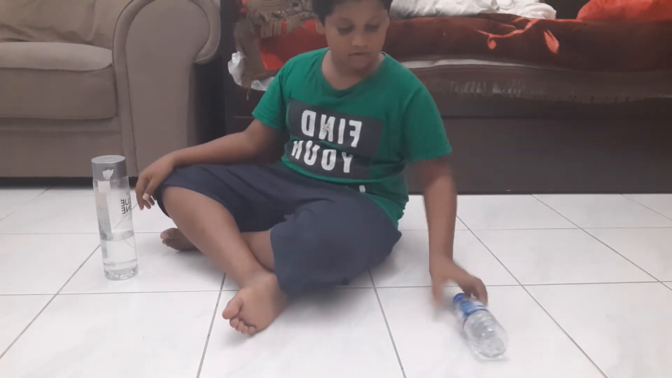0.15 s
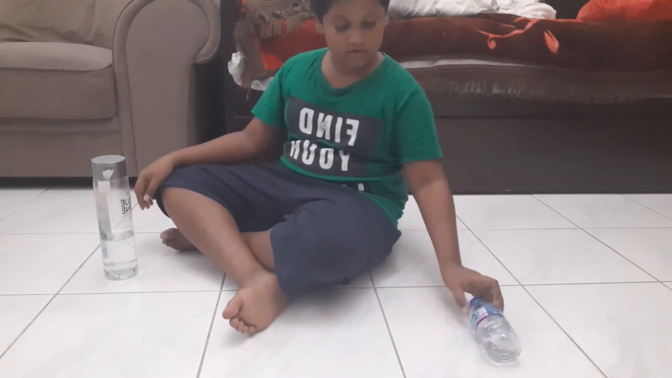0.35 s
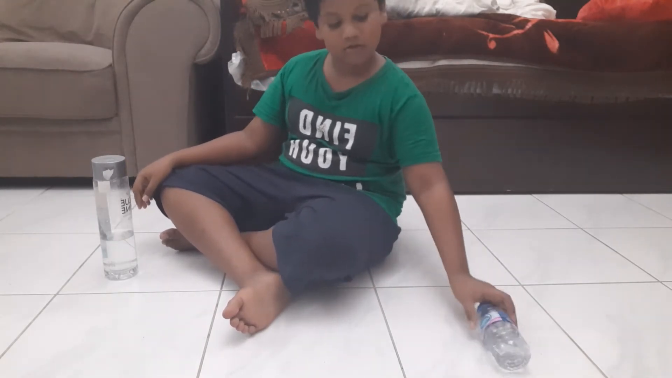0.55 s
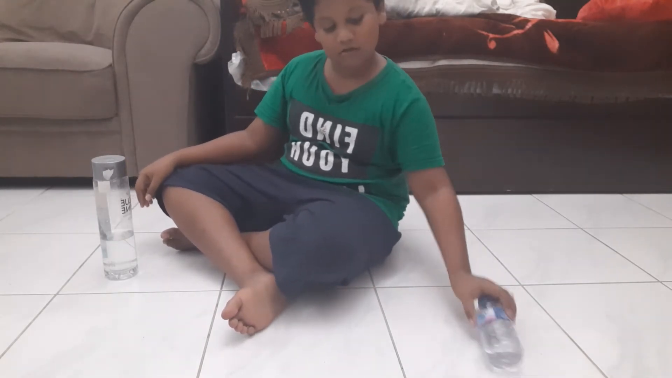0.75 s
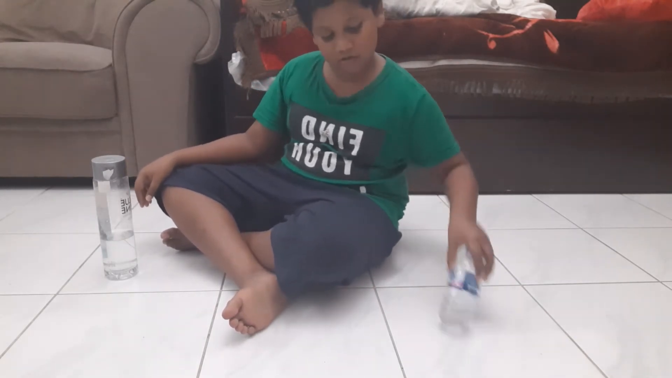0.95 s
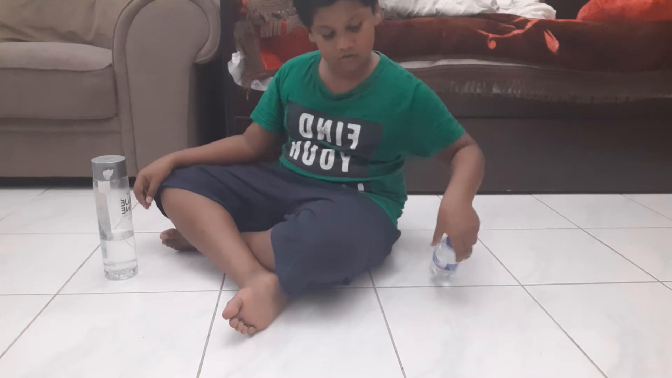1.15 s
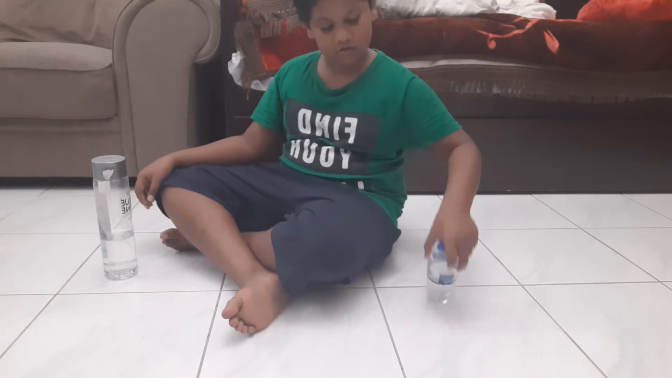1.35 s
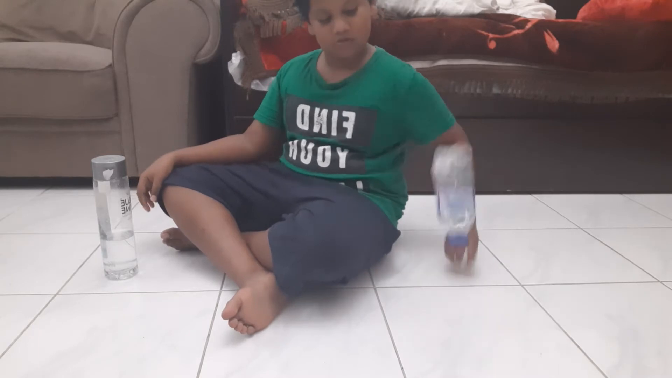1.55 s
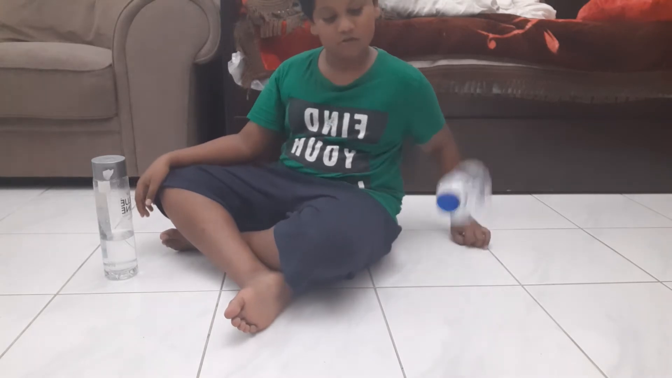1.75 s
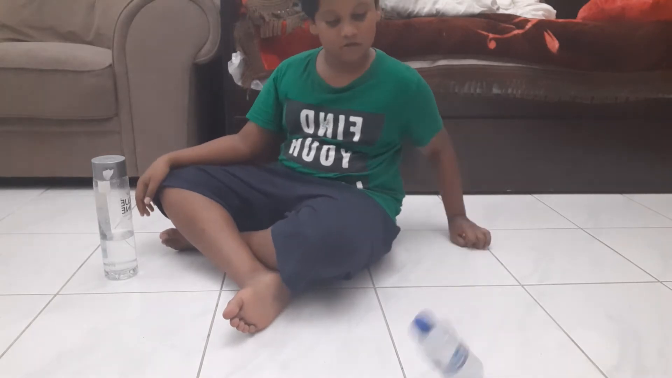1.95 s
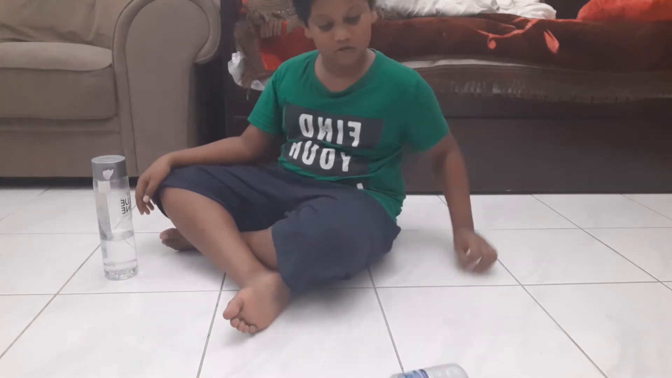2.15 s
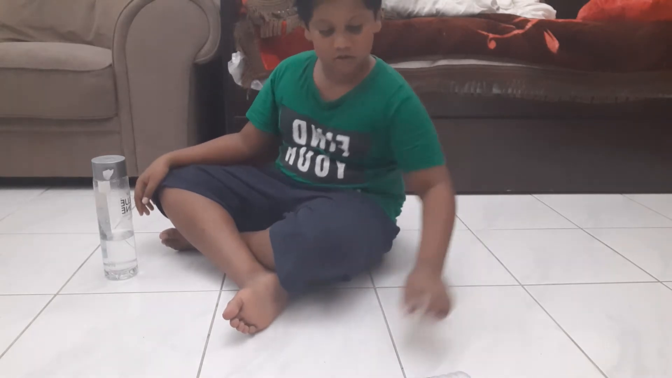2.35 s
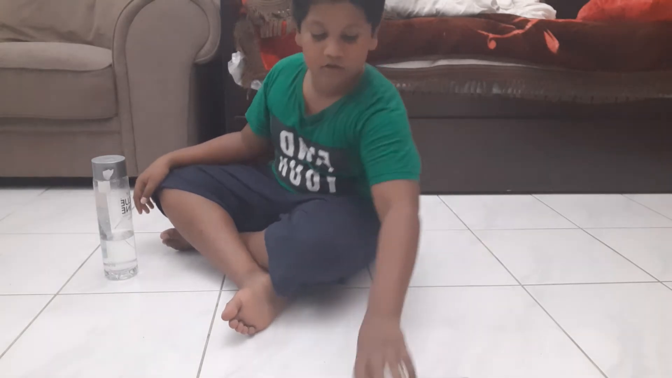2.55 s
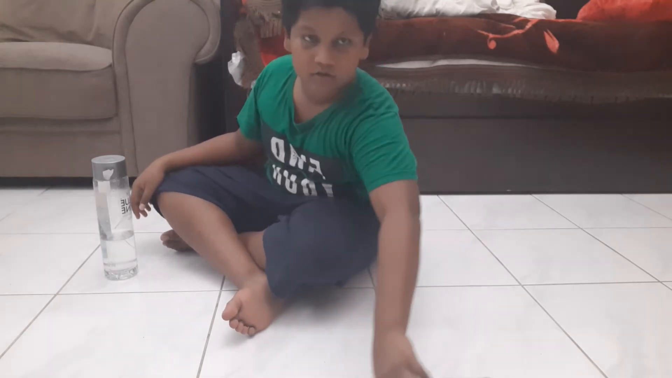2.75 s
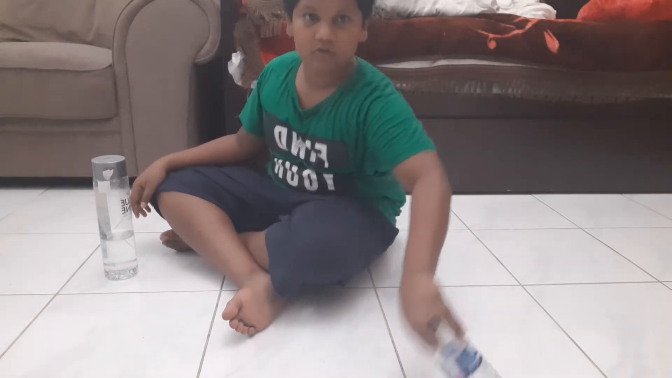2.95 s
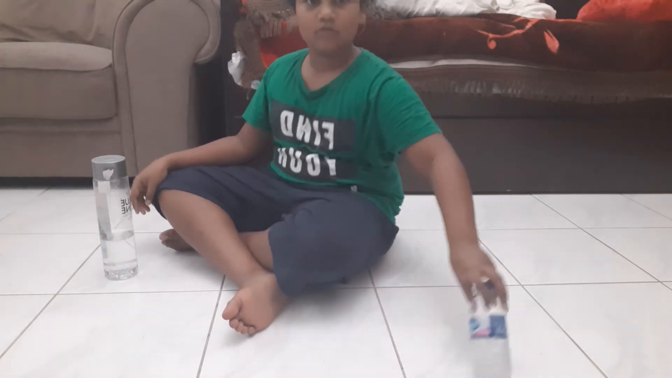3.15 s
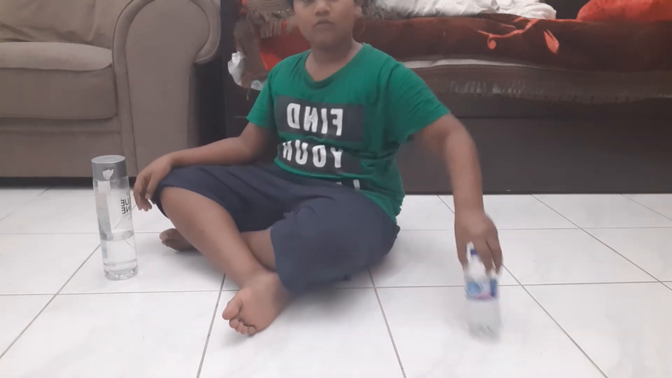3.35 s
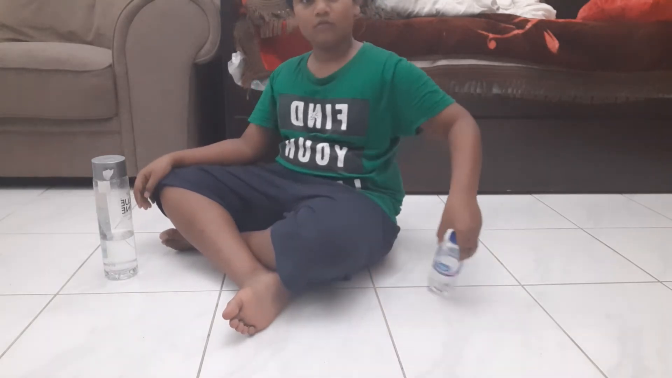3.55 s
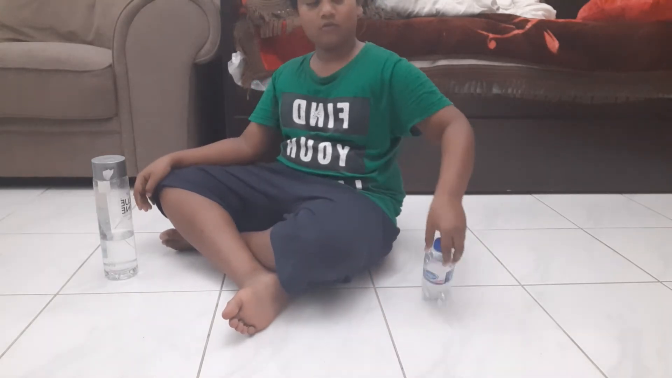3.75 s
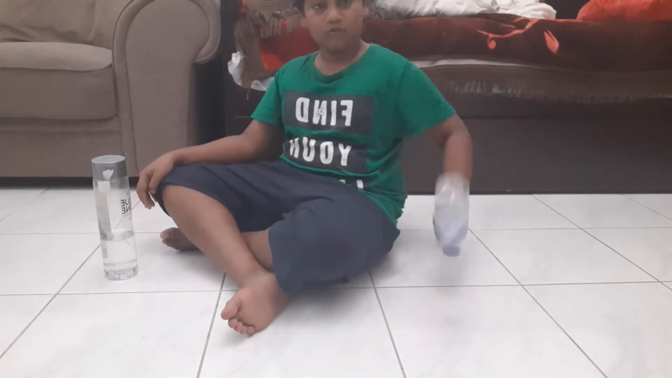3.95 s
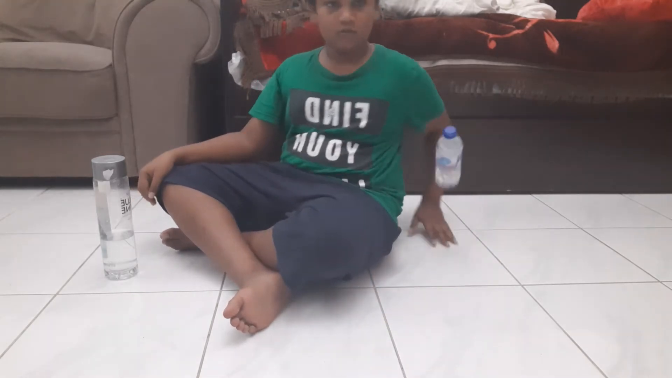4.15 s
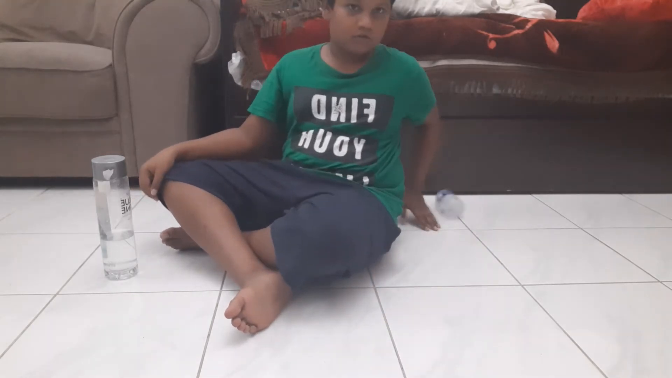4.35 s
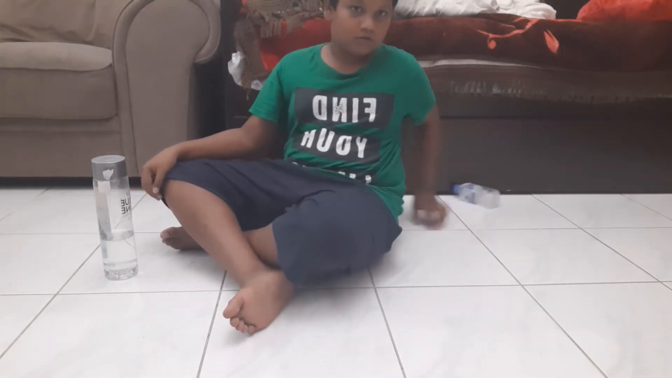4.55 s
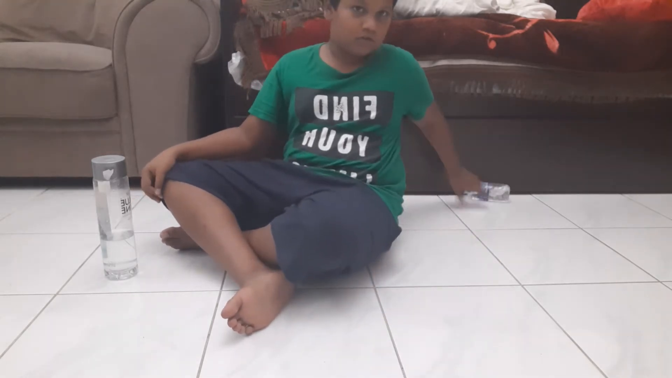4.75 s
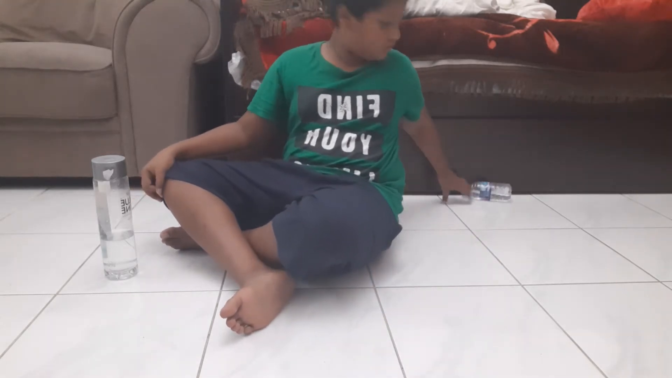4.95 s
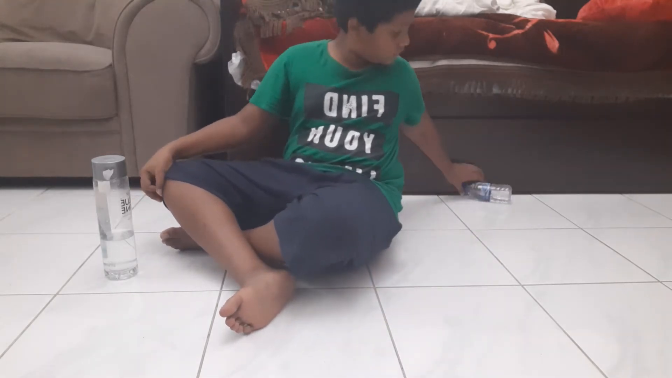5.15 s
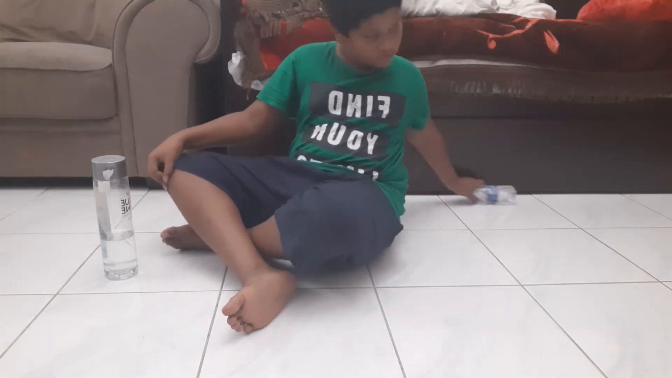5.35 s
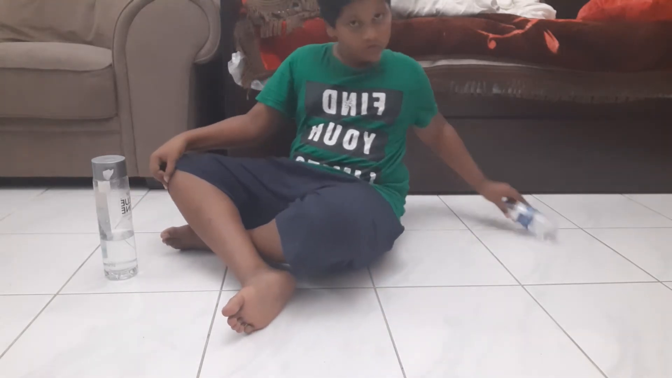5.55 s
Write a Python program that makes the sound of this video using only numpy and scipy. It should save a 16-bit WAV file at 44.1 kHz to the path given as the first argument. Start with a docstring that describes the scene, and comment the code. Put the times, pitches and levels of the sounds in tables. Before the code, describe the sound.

Light plastic ticks and watery rustle lead to a loud, hollow bottle slap on tile with a quick bounce. After a lull with small finger taps, crackling handling precedes another hard landing, which fades into faint knocks. Each hit is short and dry, with a brief room tail. Soft fan hiss, low mains hum, rapid fine motor ticking and uneven low rumble lie beneath, heard by a stereo microphone.

```python
"""A small, partly filled plastic bottle is handled, flipped and bounced twice on a tiled floor in a furnished room.
Fingers and water rustle first; near 1.9 s it lands hard and bounces. Handling resumes, it lands again
near 4.4 s, and light knocks end the scene. Each blow sums a decaying thud, shell modes and crackling noise.
Throughout, a fan gives shaped noise for hiss, sines for mains hum and a modal tick each mains cycle; a low
noise rumble of uneven level lies below. A diffuse noise tail forms the room; a two-port microphone listens."""
import sys
import numpy as np
from scipy import signal
from scipy.fft import rfft, irfft
from scipy.io import wavfile
from scipy.ndimage import uniform_filter1d

SR = 44100
rng = np.random.default_rng(int(sys.argv[2]) if len(sys.argv) > 2 else 0)


def elevation(decibels):
    """Turn decibel levels (scalar or array-like) into linear amplitude ratios."""
    levels = np.asarray(decibels, float)
    return 10 ** (levels / 20)


def generate_wav(signal):
    """Clip the signal to [-1, 1] and save it as 16-bit WAV at the path in sys.argv[1]."""
    frames = np.transpose(np.atleast_2d(signal))
    scaled = np.clip(frames, -1, 1) * 32767
    pcm = np.round(scaled).astype(np.int16)
    wavfile.write(sys.argv[1], SR, pcm)


N = 246298
TIME = np.arange(N) / SR


def on_log(table, hz, axis=1):
    """Logarithmic frequency scale: one column of a table, interpolated along log frequency."""
    table = np.array(table)
    return np.interp(np.log(np.maximum(hz, 1)), np.log(table[:, 0]), table[:, axis])


def unit(x):
    """Normalisation: the signal is scaled to rms 1."""
    return x / np.sqrt(np.mean(x ** 2))


def leveled(x, db):
    """Onset level: the rms of the first 20 ms is set."""
    return elevation(db) * x / np.sqrt(np.mean(x[:SR // 50] ** 2))


def colour(x, table, lo_hz=0, hi_hz=SR):
    """Linear filtering: a spectral envelope is applied between two band edges."""
    hz = np.arange(x.shape[-1] // 2 + 1) * SR / x.shape[-1]
    in_band = (hz >= lo_hz) * (hz < hi_hz)
    return irfft(rfft(x) * elevation(on_log(table, hz)) * in_band, x.shape[-1])


def diffuse(size, likeness):
    """Spatial coherence: mid and side noise are weighted for a set correlation of two ports."""
    hz = np.arange(size // 2 + 1) * SR / size
    like = np.clip(on_log(likeness, hz), -.9, .99)
    mid, side = rfft(rng.standard_normal((2, size)))
    mid = mid * np.sqrt(1 + like)
    side = side * np.sqrt(1 - like)
    return irfft(np.array([mid + side, mid - side]), size) / np.sqrt(2)


def fade(t, t60):
    """Exponential decay: the level falls 60 dB in t60 seconds."""
    return 1000. ** (-t / np.maximum(t60, 1e-3))


def ring(modes, t, chance, scatter_db, detune):
    """Modal superposition: decaying sines, one a row, with scattered strength, pitch and phase."""
    hz, db, t60 = np.array(modes).T[:, :, None]
    gain = elevation(db + scatter_db * chance[0])
    hz = hz * (1 + detune * chance[1])
    return gain * fade(t, t60) * np.sin(2 * np.pi * hz * t + chance[2])


def walk(rate):
    """Slow random modulation: levels held 1 / rate s and smoothed twice; spread near 1."""
    k = int(SR / rate)
    steps = np.repeat(rng.standard_normal(N // k + 1), k)
    return 1.4 * uniform_filter1d(uniform_filter1d(steps, k), k)[:N]


def add(out, x, s):
    """Linear superposition: a short sound is added from s seconds on."""
    i = int(s * SR)
    out[i:i + len(x)] += x[:max(len(out) - i, 0)]


# Blows, bounces and finger knocks on the body: (time [s], thud frequency [Hz], thud level [dB],
# favoured shell frequency [Hz], level of shell modes from 850 Hz up [dB], crack level [dB])
BLOWS = [(0.015, 358, -51.5, 1840, -37.5, -53.5), (0.028, 388, -56.5, 634, -40, -82.5),
         (0.382, 390, -55, 1034, -48, -78), (1.32, 280, -53, 1200, -37, -65),
         (1.502, 392, -55.5, 1290, -58, -70), (1.518, 393, -49.5, 1230, -42, -65),
         (1.608, 157, -40, 960, -35.5, -79), (1.632, 181, -50.5, 950, -42, -59),
         (1.935, 210, -25.5, 1010, -7.5, -26.5), (1.971, 180, -38, 960, -40, -46),
         (2.082, 178, -31.5, 1750, -20.5, -35.5), (2.089, 172, -30.5, 600, -25.5, -49),
         (2.136, 353, -49, 760, -47, -44.5), (2.669, 380, -55, 895, -45, -58),
         (3.028, 165, -59, 1330, -47, -76), (3.142, 518, -58, 600, -46, -61.5),
         (3.352, 450, -62, 1530, -63, -80), (3.855, 447, -50.5, 1630, -34, -51.5),
         (3.97, 438, -48, 1490, -44.5, -51.5), (3.977, 372, -43.5, 1360, -45, -71),
         (4.054, 386, -53, 960, -52, -46.5), (4.285, 287, -50, 1190, -51, -56),
         (4.312, 310, -45.5, 2030, -60.5, -56.5), (4.355, 179, -32, 755, -16.5, -37),
         (4.362, 397, -34, 1540, -18, -29), (4.48, 251.5, -22, 894, -10, -36.5),
         (4.486, 260, -28.5, 2300, -14.5, -49), (4.549, 273, -44, 724, -33, -44.5),
         (4.681, 368, -57.5, 956, -51, -57), (4.71, 360, -43.5, 930, -43.5, -58),
         (4.782, 151, -53.5, 710, -51, -62), (4.884, 153, -54, 845, -49.5, -71),
         (5.166, 220, -55.5, 1560, -70, -73), (5.237, 148, -53.5, 1530, -48.5, -70),
         (5.553, 149, -53.5, 2210, -58.5, -56)]
# Shell modes: (frequency [Hz], relative level [dB], t60 [s])
SHELL_MODES = [(260.5, -1, 0.026), (385, -10.5, 0.076), (456, -2.5, 0.034), (622, -7.5, 0.037),
               (765, -3.5, 0.018), (960, -2, 0.015), (1150, 0, 0.0093), (1374, -7, 0.026),
               (1550, -0.5, 0.018), (1773, -4, 0.011), (2030, -6, 0.016), (2290, -5.5, 0.0078),
               (2596, -10, 0.011), (2887, -10.5, 0.011)]
# Bright crackles and snaps, some alone, some on top of a blow: (time [s], crack level [dB], snap level [dB])
BRIGHT_CRACKLES = [(0.466, -77, -68), (0.899, -70, -71), (1.135, -73, -72), (1.502, -63, -61.5),
                   (1.518, -63, -55), (1.594, -69, -56), (2.183, -76, -69), (2.375, -62, -78),
                   (2.959, -67, -69.5), (3.056, -60, -69), (3.092, -76, -68), (3.972, -70, -57),
                   (4.017, -64, -49.5), (4.054, -62, -60), (4.362, -49.5, -28), (5.454, -67, -62)]


def bottle():
    """Impact excitation: a blow sets off the water-loaded wall's thud, the shell modes and a crack."""
    thud_t60_s, thud_rise_s, contact_s = 0.044, 0.0013, 0.0013
    snap_under_crack_db = 10
    out = np.zeros(N)
    t = np.arange(4096) / SR
    mode_hz = np.array(SHELL_MODES)[:, :1]
    for s, thud_hz, thud_db, spot_hz, shell_db, crack_db in BLOWS:
        chance = rng.standard_normal((3, len(SHELL_MODES), 1))
        modes = ring(SHELL_MODES, t, chance, scatter_db=2.5, detune=.02)
        modes *= 1 - np.exp(-t / contact_s)
        # the spot that is struck favours the modes near its own pitch
        modes *= 1 + 2.0 * np.exp(-(np.log(mode_hz / spot_hz) / .14) ** 2)
        # low modes follow the weight of the thud, high ones the hardness of the contact
        lean_db = on_log([(400, thud_db + 10.0), (850, shell_db)], mode_hz)
        shell = np.sum(elevation(lean_db) * modes, axis=0) / np.abs(modes.sum(axis=0)).max()
        add(out, shell, s)
        thud = (1 - np.exp(-t / thud_rise_s)) * fade(t, thud_t60_s) * np.sin(2 * np.pi * thud_hz * t)
        crack = chatter(t, crack_db, crack_db - snap_under_crack_db)
        add(out, leveled(thud, thud_db) + crack, s)
    for s, crack_db, snap_db in BRIGHT_CRACKLES:
        add(out, chatter(t, crack_db, snap_db), s)
    # high-pass: keeps the bottle's sound free of deep bass
    return signal.sosfilt(signal.butter(2, 110, "high", fs=SR, output="sos"), out)


def chatter(t, crack_db, snap_db):
    """Broadband contact noise: one sharp contact, then the wall chatters, evenly over all pitches."""
    push_t60_s, contact_s = 0.044, 0.0013
    push = rng.standard_normal(len(t)) * fade(t, push_t60_s) * (1 - np.exp(-(t / contact_s) ** 2))
    push[int(contact_s * SR)] += 5.0
    tones = rfft(push)
    # dividing by the smoothed magnitude flattens the spectrum before it is coloured
    even = irfft(tones / uniform_filter1d(np.abs(tones), size=7), len(t))
    crack, snap = crackle(even * fade(t, 2 * push_t60_s))
    return leveled(crack, crack_db) + leveled(snap, snap_db)


# Colour of the crack and snap: (frequency [Hz], relative spectral density [dB per Hz])
CRACK_COLOUR = [(1500, 1.5), (2300, -1.5), (3100, -2.5), (4100, 1.5), (5500, 0), (7900, -4), (8600, -17),
                (9700, -14.5), (11600, -9.5), (14800, -12), (16000, -8.5)]


def crackle(x):
    """Band splitting: a crack below and a snap above one edge, each of rms 1."""
    split_hz = 7900
    crack = unit(colour(x, CRACK_COLOUR, hi_hz=split_hz))
    snap = unit(colour(x, CRACK_COLOUR, lo_hz=split_hz))
    return np.array([crack, snap])


# Spells of fingers on the label and water in the bottle:
# (start [s], length [s], crack level [dB], snap level [dB])
RUSTLE_SPELLS = [(0.0, 0.03, -59, -63), (0.314, 0.15, -71.5, -75.5), (0.848, 0.14, -74, -85),
                 (1.03, 0.059, -70, -79), (1.48, 0.14, -67, -80), (2.956, 0.37, -79, -83.5),
                 (3.91, 0.14, -59, -67.5), (4.29, 0.067, -52, -62.5), (5.252, .14, -70.5, -72.5),
                 (5.462, 0.086, -62, -64.5)]


def rustle():
    """Amplitude-modulated noise: grainy crackle of label and water that rises, holds and fades."""
    rise_s, t60_s = .02, .15
    grain = unit(elevation(4.4 * walk(150)))
    crack, snap = crackle(rng.standard_normal(N)) * grain
    out = np.zeros(N)
    for s, length, crack_db, snap_db in RUSTLE_SPELLS:
        rise = np.clip((TIME - s) / rise_s, 0, 1)
        envelope = rise * fade(np.maximum(TIME - s - length, 0), t60_s)
        out += envelope * (elevation(crack_db) * crack + elevation(snap_db) * snap)
    return out


# Room tail: (frequency [Hz], t60 [s], level against the direct sound [dB])
ROOM_BANDS = [(120, 0.3, -6.5), (260, 0.44, -2.5), (600, 0.36, 2.5), (1346, 0.34, -1.5), (2900, 0.42, 5.5),
              (6070, 0.39, -1), (12200, 0.37, 4.5)]
# Likeness of the two ports for the room tail: (frequency [Hz], correlation [1])
ROOM_LIKENESS = [(130, .97), (290, .94), (640, .72), (1400, .3), (3100, .05), (6800, 0)]


def room(x):
    """Reverberation: convolution with a diffuse tail that dies band by band."""
    t = np.arange(SR // 2) / SR
    noise = rfft(diffuse(len(t), ROOM_LIKENESS))
    hz = np.arange(len(t) // 2 + 1) * 2.
    tail = 0
    for k, (_, t60, db) in enumerate(ROOM_BANDS):
        # neighbouring bands cross over so that their shares add up to 1
        share = on_log([(row[0], j == k) for j, row in enumerate(ROOM_BANDS)], hz)
        # the first echoes come off the floor and furniture
        envelope = fade(t, t60) * (1 - np.exp(-t / 0.001))
        envelope = envelope / np.sqrt(np.sum(envelope ** 2))  # unit energy
        tail = tail + elevation(db) * irfft(noise * share, len(t)) * envelope
    return signal.fftconvolve(x[None], tail, axes=1)[:, :N]


MAINS_HZ = 50.0113
# What the motor tick rings: (frequency [Hz], relative level [dB], t60 [s])
TICK_MODES = [(3720, -10.5, 0.024), (3946, -1, 0.028), (4260, -2, 0.019), (5110, -13, .012),
              (5404, 0.5, 0.02), (5556, 4, 0.022), (5790, 0.5, 0.02), (5920, -15, 0.011), (6780, -8, 0.029),
              (7650, -7.5, 0.02), (7580, -10.5, 0.014)]


def ticks():
    """Periodic modal excitation: the motor ticks once a mains cycle, each a little different."""
    first_s, gain_db = .0064, -65
    out = np.zeros(N)
    t = np.arange(SR // 50) / SR
    rise = 1 - np.exp(-(t / .0004) ** 2)
    for s in np.arange(first_s, TIME[-1], 1 / MAINS_HZ):
        chance = .6 * rng.standard_normal((3, len(TICK_MODES), 1))
        tick = ring(TICK_MODES, t, chance, scatter_db=3, detune=.02)
        add(out, elevation(1.5 * rng.standard_normal()) * rise * tick.sum(axis=0), s)
    return elevation(gain_db) * out


# Colour of the air hiss: (frequency [Hz], relative spectral density [dB per Hz])
HISS_COLOUR = [(65, -30), (110, -1.5), (130, -6.5), (200, -14.5), (320, -13), (600, -20.5), (1000, -13),
               (1550, -14), (2200, -21.5), (3000, -34), (5500, -26.5), (7800, -34.5), (8200, -71),
               (10300, -44), (15700, -35.5)]
# Likeness of the two ports for hiss and low rumble: (frequency [Hz], correlation [1])
BACKGROUND_LIKENESS = [(60, 0.97), (130, 0.92), (290, 0.69), (640, 0.22), (1410, -0.18), (3100, -0.01),
                       (6820, -0.12), (15000, 0.02)]
# Mains hum: (multiple of the mains frequency [1], rms level [dB])
HUM = [(2, -61), (3, -70.5), (4, -71.5), (5, -84.5)]


def fan():
    """Flow noise and harmonic hum: air hiss that breathes a little, and mains harmonics."""
    hiss_db = -58 + 0.77 * walk(2.8)
    hiss = elevation(hiss_db) * unit(colour(diffuse(N, BACKGROUND_LIKENESS), HISS_COLOUR))
    hum = sum(elevation(db) * np.sqrt(2) * np.sin(2 * np.pi * k * MAINS_HZ * TIME + 0.19) for k, db in HUM)
    return hiss + hum


# Uneven level of the low rumble, strongest around the hard blows: (time [s], level [dB])
LOW_RUMBLE_LEVEL = [(0.0, -49.5), (0.36, -60.5), (0.46, -51), (1.21, -57), (1.3, -54.5), (1.86, -57),
                    (1.93, -46), (2.08, -39), (2.56, -65.5), (2.89, -49), (2.98, -53.5), (3.28, -47.5),
                    (3.59, -60), (4.06, -49.5), (4.15, -53), (4.45, -43), (4.82, -55.5), (5.58, -56)]
# Colour of the low rumble: (frequency [Hz], relative spectral density [dB per Hz])
LOW_RUMBLE_COLOUR = [(20, -35), (36, 1.5), (50, -3.5), (66, 2.5), (85, -11.5), (100, -47.5)]


def low_rumble():
    """Band-limited noise: a low rumble of uneven level, strongest around the hard blows."""
    level_db = np.interp(TIME, *np.transpose(LOW_RUMBLE_LEVEL))
    noise = colour(diffuse(N, BACKGROUND_LIKENESS), LOW_RUMBLE_COLOUR, hi_hz=110.6)
    return elevation(level_db) * unit(noise)


def scene():
    """Superposition of direct and reverberant sound: bottle and motor in the room, over the background."""
    left_lag = 4  # samples
    motor_room_db = -1.5
    near = bottle() + rustle()
    motor = ticks()
    # the bottle lies off to the right, so its sound reaches the left port late
    direct = np.array([np.roll(near, left_lag), near])
    return direct + motor + room(near + elevation(motor_room_db) * motor) + fan() + low_rumble()


def roll_off(x):
    """The treble ends steeply here."""
    return signal.sosfilt(signal.butter(12, 16810, fs=SR, output="sos"), x)


def record(dry):
    """Band limiting and port sensitivity: bass and top are cut, and the left port is the weaker."""
    top_hz, bass_hz = 15720, 60
    left_over_right_db = -2.4
    dry = signal.sosfilt(signal.ellip(10, .3, 60, top_hz, fs=SR, output="sos"), dry)
    dry = signal.sosfilt(signal.butter(2, bass_hz, "high", fs=SR, output="sos"), dry)
    mix = dry * elevation(np.array([[left_over_right_db], [-left_over_right_db]]) / 2)
    return roll_off(mix)


dry = scene()
out = record(dry)
generate_wav(out)
```